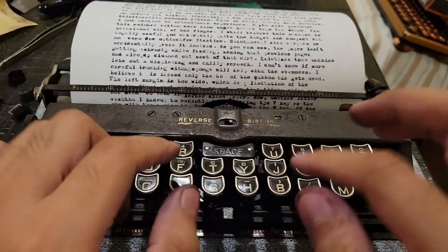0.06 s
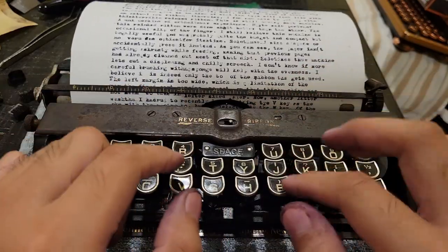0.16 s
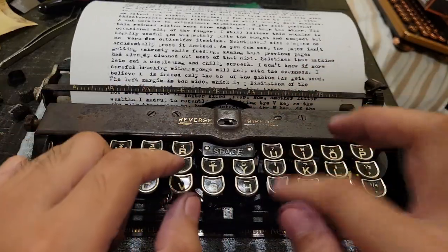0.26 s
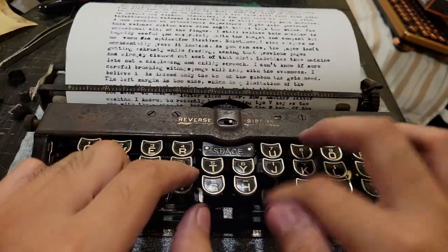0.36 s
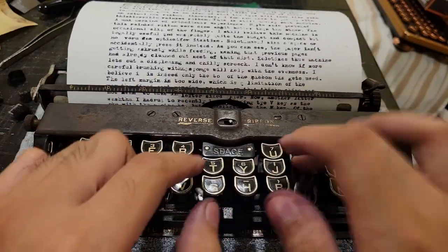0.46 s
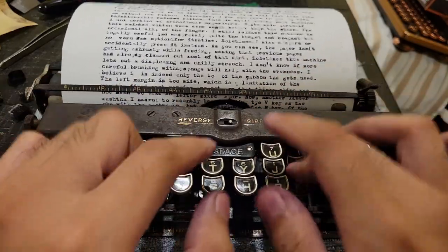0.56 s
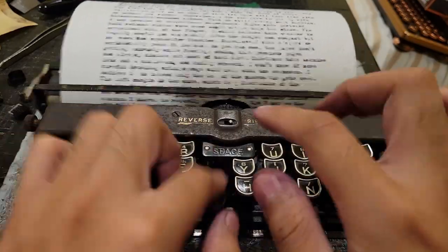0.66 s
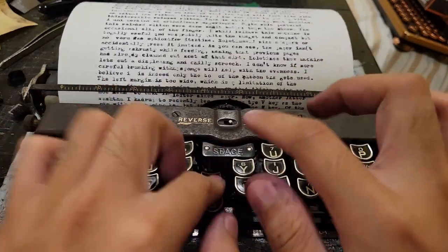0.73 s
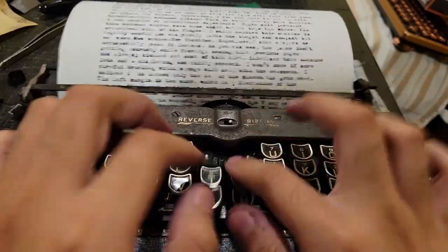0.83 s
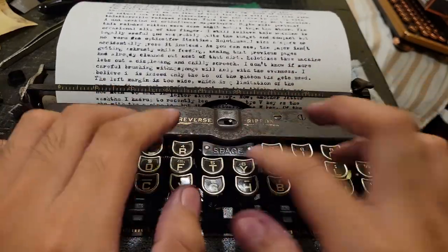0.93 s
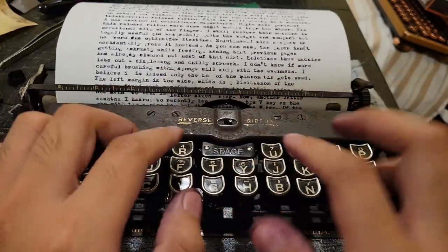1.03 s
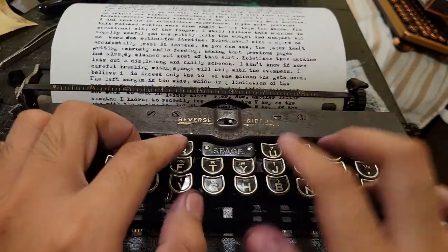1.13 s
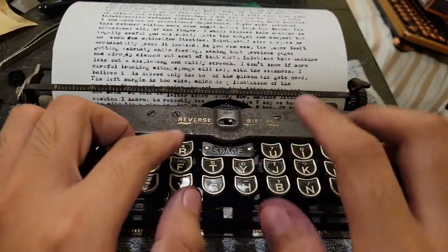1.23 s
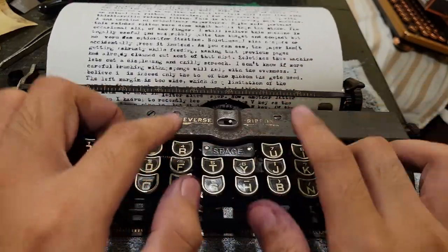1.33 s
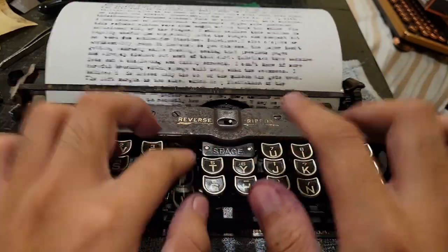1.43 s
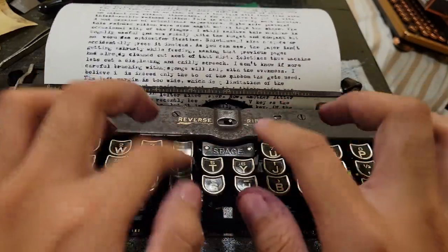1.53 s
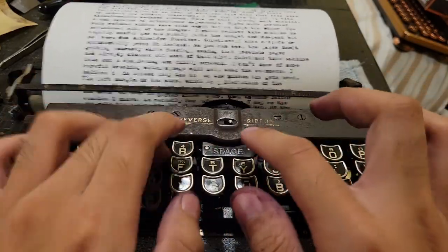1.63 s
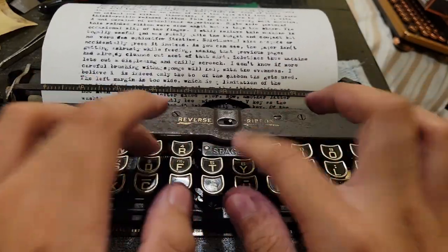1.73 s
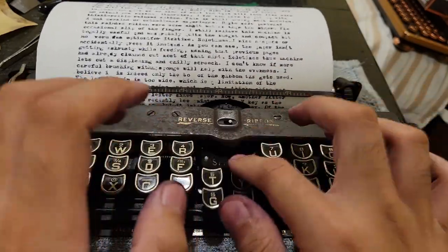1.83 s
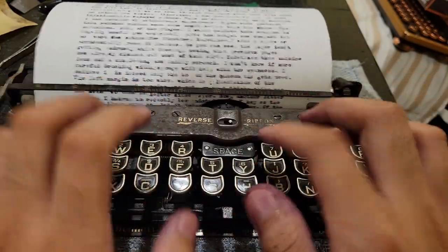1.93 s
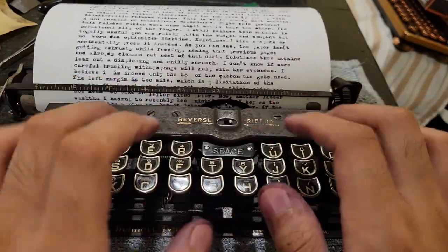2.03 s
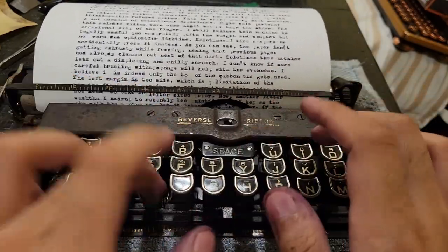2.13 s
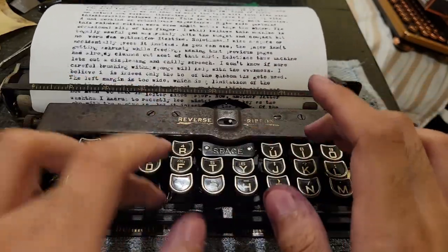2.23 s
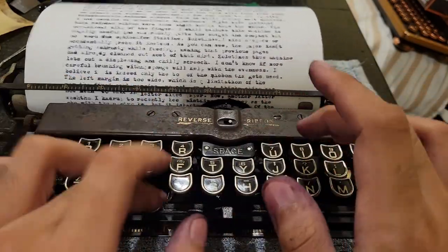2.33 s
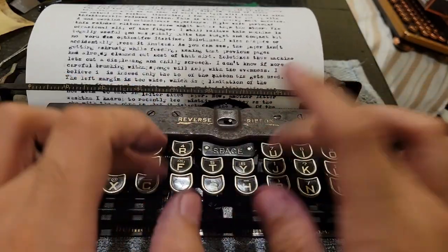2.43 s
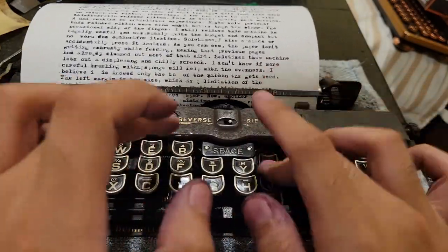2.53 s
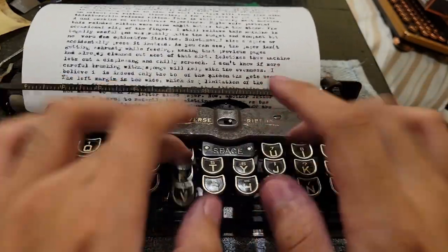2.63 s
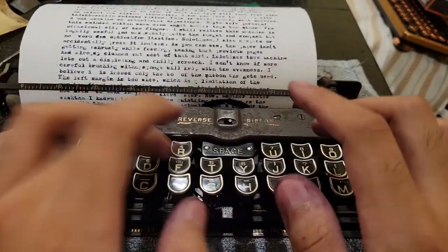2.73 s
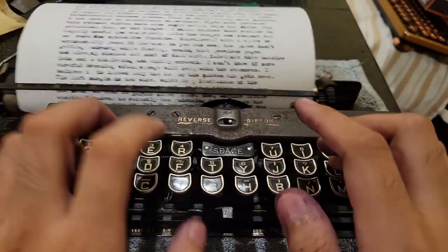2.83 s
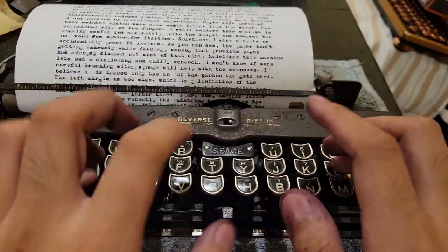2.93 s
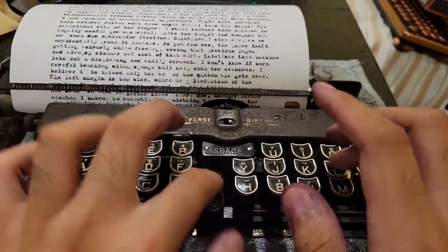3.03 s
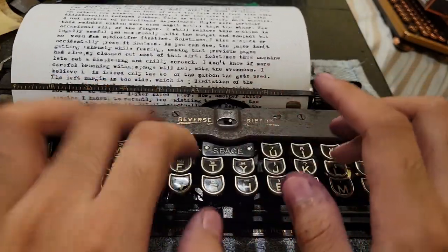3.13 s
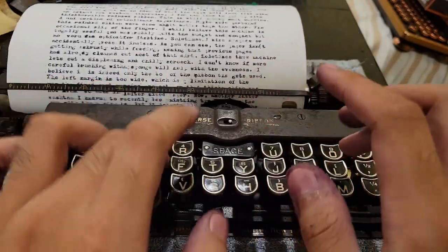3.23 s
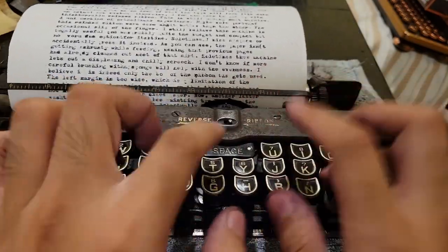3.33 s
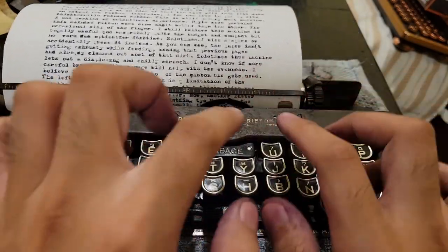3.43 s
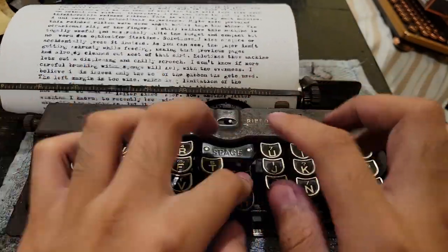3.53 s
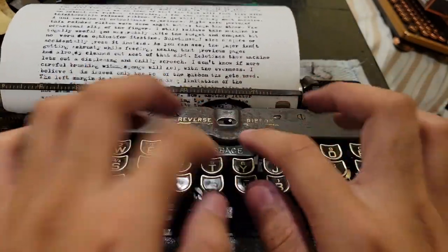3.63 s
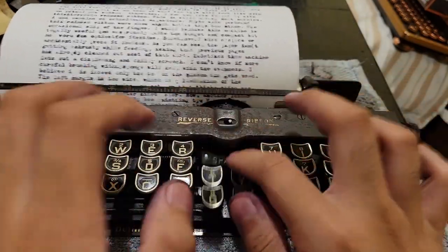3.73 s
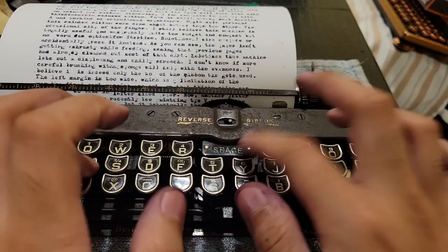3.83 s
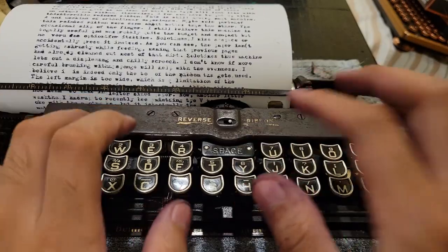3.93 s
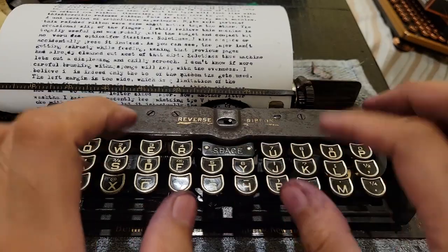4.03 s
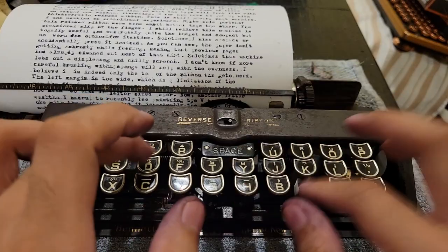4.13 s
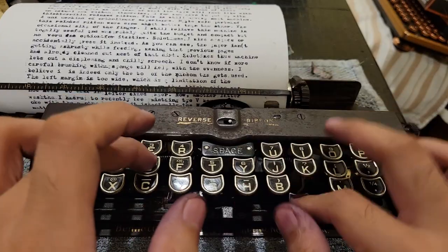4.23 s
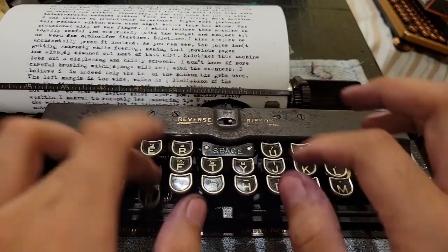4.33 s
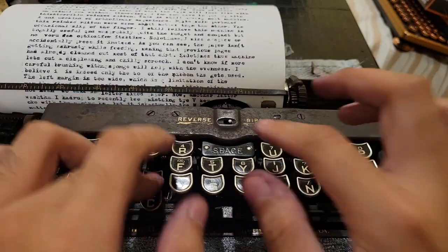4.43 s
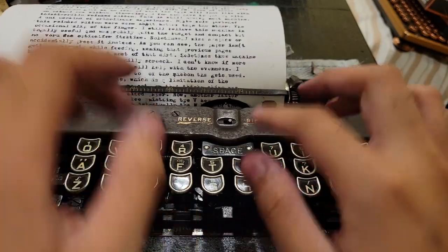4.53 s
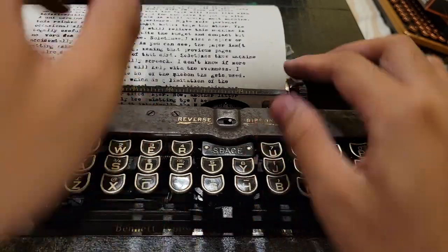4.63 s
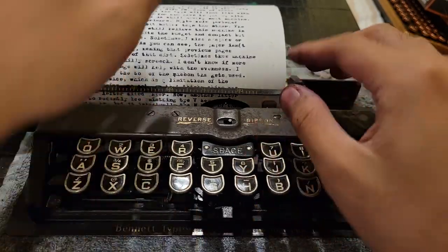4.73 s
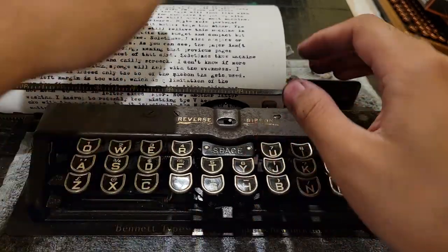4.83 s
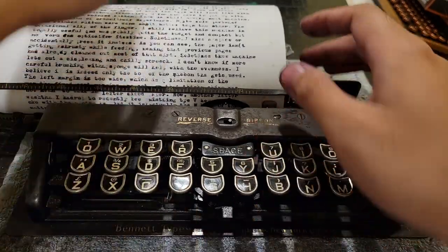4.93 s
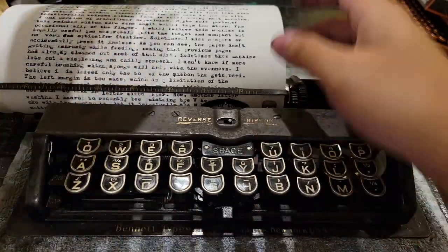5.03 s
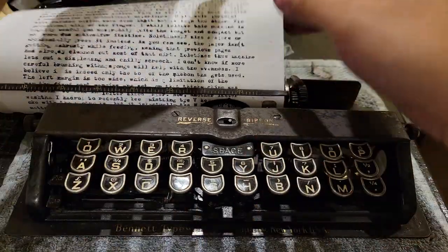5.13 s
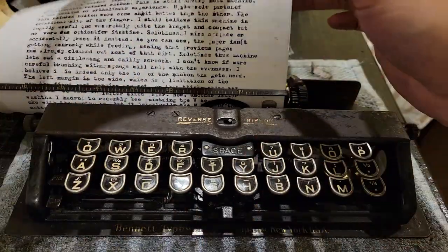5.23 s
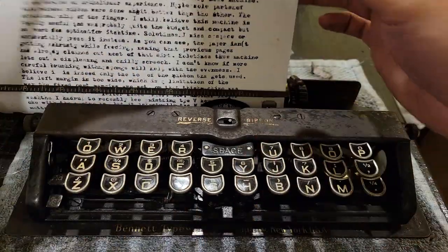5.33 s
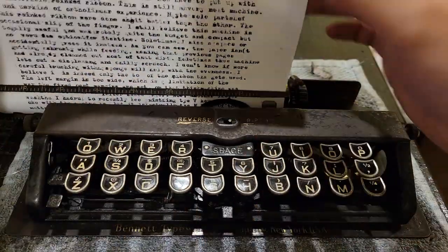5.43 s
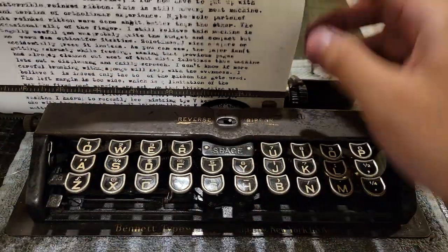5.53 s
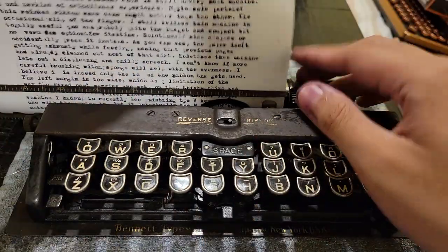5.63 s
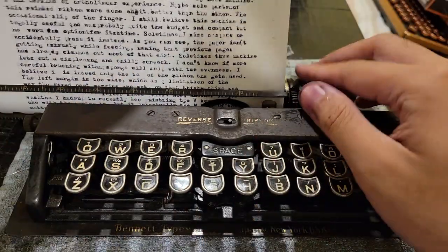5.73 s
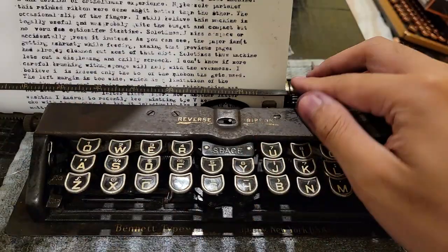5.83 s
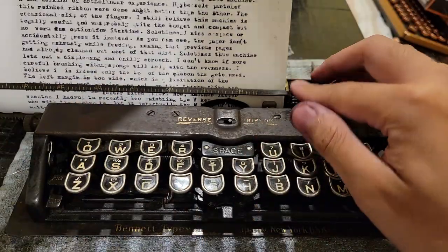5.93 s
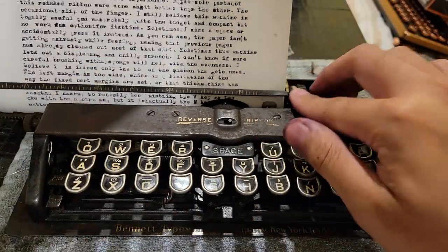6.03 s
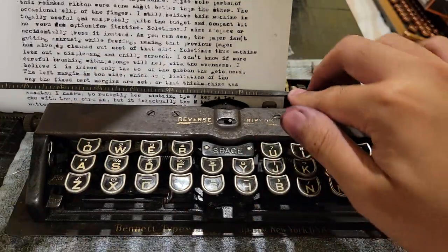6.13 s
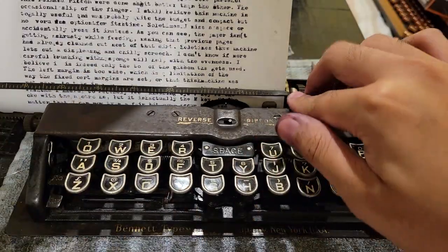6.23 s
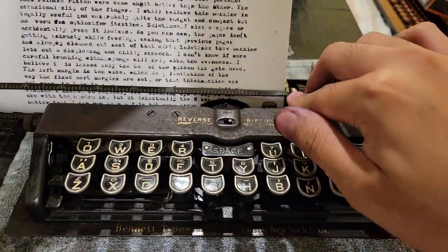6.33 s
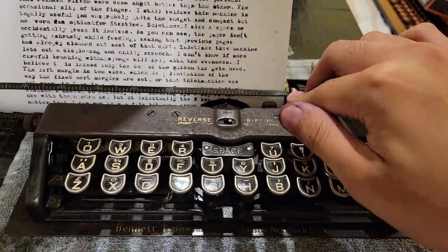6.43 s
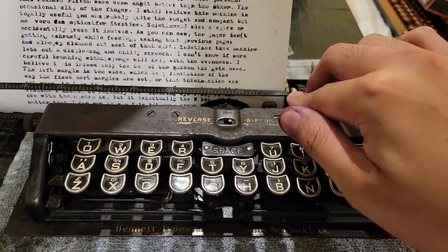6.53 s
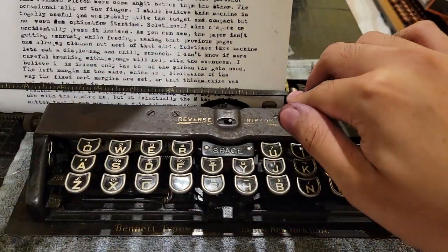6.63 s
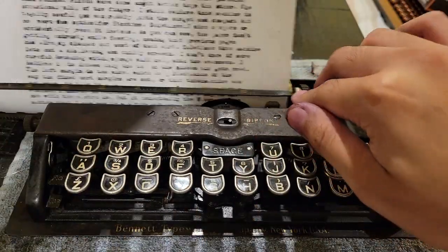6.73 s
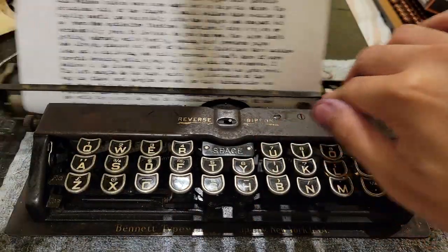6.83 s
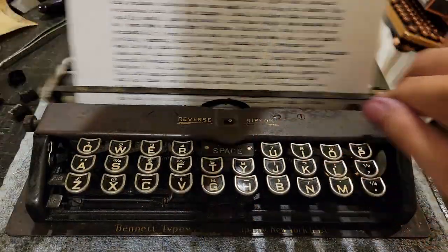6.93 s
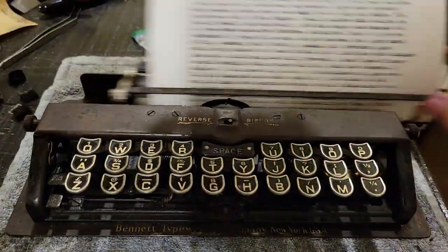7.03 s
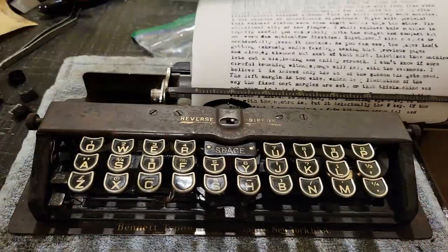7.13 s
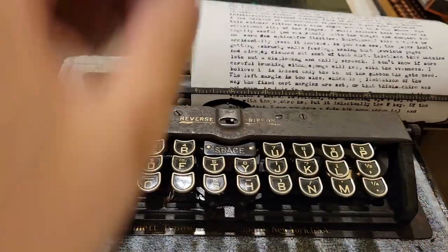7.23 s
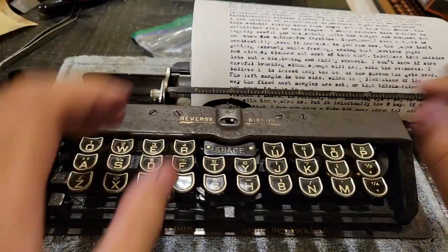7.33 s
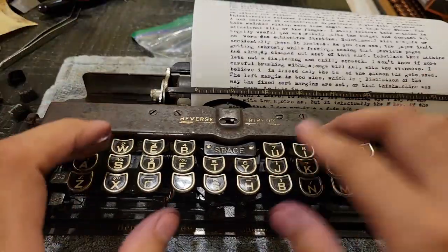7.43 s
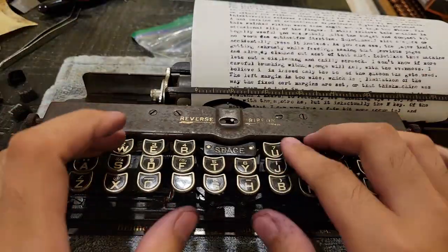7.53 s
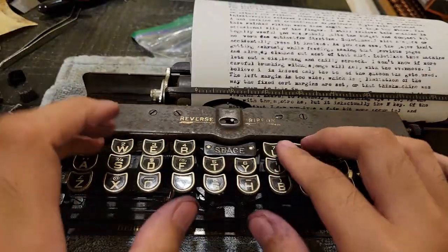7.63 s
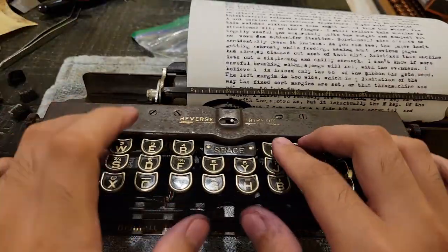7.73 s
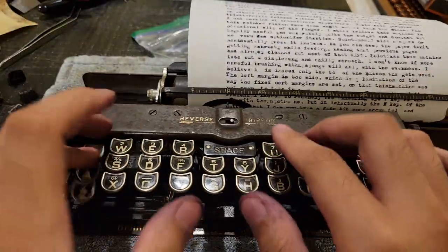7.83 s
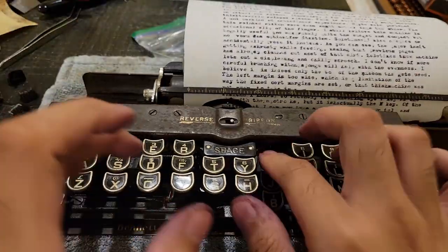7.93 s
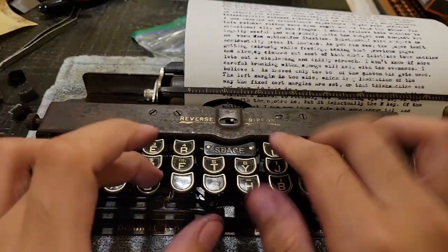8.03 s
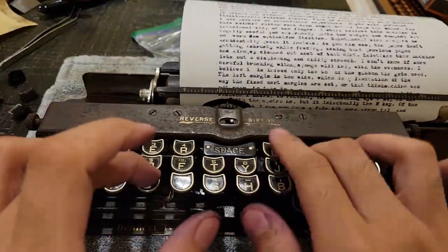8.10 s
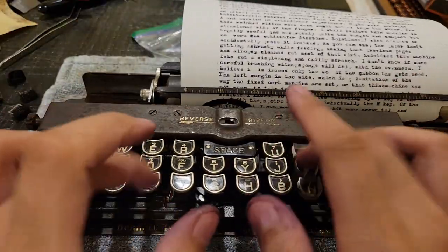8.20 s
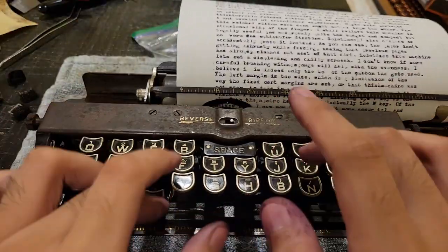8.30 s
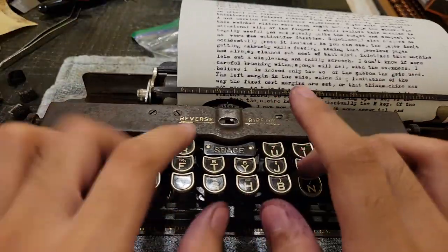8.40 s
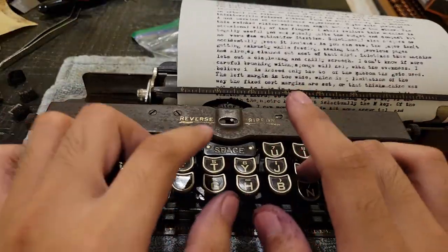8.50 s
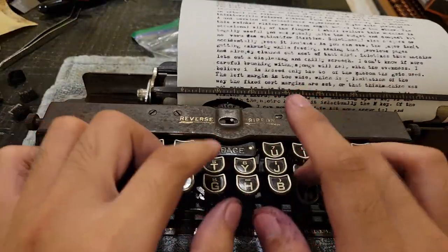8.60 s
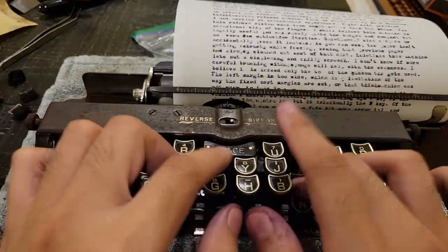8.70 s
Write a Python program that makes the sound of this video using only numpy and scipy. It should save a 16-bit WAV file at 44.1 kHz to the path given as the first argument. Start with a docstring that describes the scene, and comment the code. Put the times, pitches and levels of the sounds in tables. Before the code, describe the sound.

Close stereo microphone just above a small manual typewriter in a quiet room with short, diffuse reflections and faint low air noise. At 0 s a trace of an earlier stroke dies away. From about 0.3 to 4.5 s fast, slightly irregular typing, five or six letters a second: each a lever click, a hard bright steel crack on the platen, and a bottoming knock, with brief lever ringing, a weak table thud, rattling and lighter ticks between. From 5.0 to 6.3 s it is far quieter: the knob is twisted in short bursts, paper rubs softly, ratchet clicks, a tiny squeak and small bumps. A near silence follows. From 6.8 to 7.1 s the carriage slides with swelling grainy friction and low short squeaks, a click at 6.95, a bump at 7.1 and a sharp catch at 7.3, leaving a very faint spring tone. Typing resumes from 7.7 s until about 8.7 s.

```python
"""Fast typing on a small manual typewriter

Close microphone just above the keys, quiet room. Each letter is a cluster of blows: the lever clicks, the type
hits the platen, the frame thuds on the table; shaped noise makes the clicks and knocks, decaying sines the ringing.
Then the paper is wound up a line and the carriage pushed back, with grainy friction noise and short gliding
squeaks, and the typing goes on. Around it lie diffuse reflections, a faint spring tone and still air.
"""
import sys
import numpy as np
from scipy import signal
from scipy.fft import rfft, irfft
from scipy.io import wavfile

SR = 44100
rng = np.random.default_rng(int(sys.argv[2]) if len(sys.argv) > 2 else 0)


def unload_wav(signal):
    """Save mono or channel-first audio to the path in sys.argv[1] as 16-bit WAV at rate SR, clipped to [-1, 1]."""
    wavfile.write(
        sys.argv[1],
        SR,
        np.round(np.clip(np.atleast_2d(signal).T, -1, 1) * 32767).astype(np.int16),
    )


N = 386316
TIME = np.arange(N) / SR  # s
BLOW_SIZE, LEAD_SIZE = 6144, 1024  # samples of one blow, and those ahead of its contact
AGE = (np.arange(BLOW_SIZE) - LEAD_SIZE) / SR  # s since the contact

# likeness of the left and right microphone: f/Hz, correlation (0-1)
ALIKE = [(60, 1), (130, 0.8), (350, 0.6), (700, 0), (1400, 0.1), (3000, 0), (7000, 0.07)]
# steel clicking on steel, before any tilt: f/Hz, relative density/dB per Hz
CLICK = [(100, -32.5), (800, -12.5), (1500, -2), (2200, -1), (3000, 5.5), (4200, 0.5), (5500, -1.5),
         (8500, 0), (11000, -3), (13000, 0), (15500, -2)]
# carriage sliding on its rail: f/Hz, relative density/dB per Hz
RAIL = [(100,-12.5), (200,-20.5), (350,-10.5), (520,-11), (680,-13), (850,-19.5), (1360,-9.5), (2100,-14.5),
        (2800,-11.5), (5000,-14), (11000,-25.5), (14200,-19.5), (16000,-32)]
# light ringing clicks and ticks between the strikes, and one weak keystroke:
# t/s, base click level/dB, base ring level/dB
LIGHT_CLICKS = [(0.4083, -22.5, -23), (0.4339, -17, -26.5), (0.4872, -26.5, -26), (0.5, -32, -26.5),
                (0.6162, -26, -22.5), (0.6438, -19.5, -24), (0.7933, -19.5, -25.5), (0.9298, -22.5, -23.5),
                (1.05, -22, -30.5), (1.0722, -21, -22), (1.1758, -18.5, -31), (1.219, -17, -24),
                (1.2602, -31.5, -31), (1.4025, -22.5, -27.5), (1.4423, -15.5, -28.5), (1.5456, -15, -22.5),
                (1.5575, -28, -25), (1.721, -16, -25.5), (1.7462, -23.5, -24), (1.8911, -20, -24.5),
                (1.916, -31, -45), (2.0447, -21, -26), (2.0994, -18.5, -22.5), (2.1346, -28.5, -29.5),
                (2.252, -17, -25), (2.2859, -22, -26.5), (2.4311, -18, -26), (2.4668, -23, -23),
                (2.612, -22.5, -24), (2.6281, -25.5, -29.5), (2.644, -20, -36), (2.7436, -16.5, -25),
                (2.7557, -29.5, -27.5), (2.8189, -24.5, -42), (2.9206, -23, -27), (2.9747, -20.5, -22.5),
                (3.109, -17.5, -23.5), (3.2734, -18.5, -29), (3.312, -24, -25.5), (3.486, -26.5, -29),
                (3.6327, -27.5, -24), (3.6554, -19.5, -26.5), (3.7236, -24, -27), (3.8361, -19.5, -23),
                (3.8577, -27, -46.5), (3.9911, -22.5, -27.5), (4.0432, -21.5, -22.5), (4.0804, -27, -35),
                (4.2824, -24.5, -31.5), (4.3193, -17.5, -24), (4.4802, -23, -31.5), (4.521, -24.5, -24.5),
                (4.547, -31.5, -42), (7.664, -39, -45.5), (7.7062, -24, -26.5), (7.8204, -19, -23),
                (7.8788, -18, -19.5), (8.006, -18.5, -24.5), (8.023, -22, -24.5), (8.2007, -22.5, -23),
                (8.229, -17, -26), (8.3749, -15.5, -23), (8.4039, -19, -23), (8.4377, -29.5, -32),
                (8.611, -36, -37)]
# ratchet of the platen and catches of the carriage: t/s, base click level/dB, base ring level/dB
RATCHET = [(5.1345, -56, -51.5), (5.4336, -33, -34.5), (5.5412, -31.5, -27), (5.6434, -32.5, -35),
           (5.7099, -43.5, -48), (5.8047, -51.5, -59), (5.8347, -51, -49), (5.8678, -66, -47),
           (5.977, -46, -54), (6.0085, -48, -40.5), (6.0507, -59, -37), (6.2345, -52, -39),
           (6.9443, -23, -24.5), (7.257, -37.5, -58), (7.2803, -19.5, -32.5)]


def amp(db):
    """Decibels to gain."""
    return 10 ** (np.asarray(db) / 20)


def read(points, hz):
    """Interpolates (Hz, value) points along a log-frequency axis."""
    f, value = np.transpose(points)
    return np.interp(np.log(hz + 1), np.log(f), value)


def pair(left, other, alike):
    """A right-hand spectrum that shares the given part of the left one."""
    return alike * left + np.sqrt(1 - alike ** 2) * other


def noise(spectrum, size, count=1, colour_db=0, colour_hz=450):
    """Stereo noises (count, 2, size) of rms 1, each with its own chance peaks and dips about colour_hz apart."""
    hz = np.fft.rfftfreq(size, 1 / SR)
    z = rfft(rng.standard_normal((count, 2, size)))
    z[:, 1] = pair(z[:, 0], z[:, 1], read(ALIKE, hz))
    heights = rng.standard_normal((count, 256))
    colour = np.array([np.interp(hz / colour_hz, np.arange(256), h) for h in heights])[:, None]
    x = irfft(z * amp(read(spectrum, hz) + colour_db * colour), size)
    return x / np.sqrt(np.mean(x ** 2, axis=(1, 2), keepdims=True))


def swell(rise_s, lead_db=-15, lead_factor=1.4):
    """A soft onset: a weak slower rise under a strong quick one, full from the contact on."""
    before = np.minimum(AGE, 0) / rise_s
    lead = amp(lead_db)
    return (1 - lead) * np.exp(before) + lead * np.exp(before / lead_factor)


def fade(t60):
    """Free decay after the contact, 60 dB in t60 seconds."""
    return amp(-60 * np.maximum(AGE, 0) / t60)


def build_up(rise_s):
    """Slow answer of a body, silent until the contact."""
    return 1 - np.exp(-np.maximum(AGE, 0) / rise_s)


def modes(mode_rows, count, detune, scatter_db, spread):
    """Decaying sines, scattered in pitch and level from blow to blow, with a phase gap between the ears."""
    out = np.zeros((count, 2, BLOW_SIZE), np.float32)
    ears = np.array([[-0.5], [0.5]])
    for hz, db, t60 in mode_rows:
        tune, size, phase, side = rng.standard_normal((count, 4)).T[..., None, None]
        turns = hz * (1 + detune * tune) * AGE + phase
        angle = 2 * np.pi * turns + spread * side * ears
        decay = amp(db + scatter_db * size) * fade(t60)
        out += np.sin(angle.astype(np.float32)) * decay.astype(np.float32)
    return out


def play(times, db, sounds, span_s):
    """Lays the sounds at their times; db is the level each would have if packed into span_s."""
    energy = np.sum(sounds ** 2, axis=2).mean(1) / SR
    gains = amp(db) * np.sqrt(span_s / energy)
    out = np.zeros((2, N + 2 * BLOW_SIZE))
    for s, gain, sound in zip(times, gains, sounds):
        at = int(np.clip(round(s * SR), 0, N))
        out[:, at:at + BLOW_SIZE] += gain * sound
    return out[:, LEAD_SIZE:LEAD_SIZE + N]


def keystrokes():
    """Rows of blows: per letter the lever catches, the type strikes, the key bottoms; light clicks lie between."""
    # letters: strike t/s, strike level/dB, catch lead/s, catch level/dB, bottoming lag/s,
    # finger weight (ring and knock) level/dB, table thump level/dB; levels before the offsets below
    letters = [(0.311, -17.5, .016, -24, .014, -25.5, -43), (0.525, -15.5, 0.031, -18, .006, -24.5, -43),
               (0.686, -19, 0.0084, -21.5, .023, -24.5, -43.5), (0.8412, -20, .014, -20.5, .02, -25, -41),
               (1.0923, -19.5, 0.0076, -20.5, .008, -26, -43), (1.3, -14.5, .016, -18.5, 0.026, -27, -38.5),
               (1.4544, -24, .011, -31.5, .029, -29, -47.5), (1.645, -16, 0.02, -19.5, .022, -28, -48.5),
               (1.7844, -16, .016, -27, .027, -25.5, -40), (1.969, -18, 0.014, -20.5, .014, -30, -45.5),
               (2.171, -13.5, 0.024, -20.5, .014, -26, -48), (2.337, -16, 0.016, -25.5, .014, -28.5, -44),
               (2.5007, -18.5, 0.015, -21.5, .027, -28, -41.5), (2.669, -22, .012, -24, .015, -27.5, -39),
               (2.8594, -14.5, .016, -22, .01, -33, -45), (3.0181, -17, 0.0097, -27, 0.031, -28, -42),
               (3.1941, -17.5, 0.02, -15, .025, -26, -47), (3.365, -19.5, 0.025, -19, .021, -26.5, -42),
               (3.539, -20.5, 0.021, -18.5, .007, -26.5, -41), (3.757, -23, .022, -24.5, .008, -28, -38.5),
               (3.906, -16.5, 0.014, -32, .007, -30, -44.5), (4.191, -16.5, 0.024, -22, .014, -27, -45),
               (4.37, -15, 0.021, -24.5, .014, -29, -45), (7.713, -17, 0.0071, -24, .011, -26, -45.5),
               (7.903, -19, .009, -27, .024, -27.5, -41.5), (8.087, -15, 0.013, -20.5, .02, -23.5, -36),
               (8.258, -13.5, 0.02, -29, .016, -26, -44.5), (8.661, -20.5, .024, -26, 0.0061, -28.5, -44)]
    # offsets by kind of blow: steel/dB, lever ring/dB, frame knock/dB, table thump/dB; then rise/ms
    catch, strike = (-0.5, -8.5, -5, -5.5, 1.1), (0, -4, -2, -1.5, 2)
    bottom, light = (-6.5, -9.5, 0, -3.5, 3.5), (0.5, -0.5, -11.5, -30, 0.87)
    s, strength_db, lead_s, catch_db, lag_s, weight_db, thump_db = np.transpose(letters)
    return np.vstack([
        voiced(s - lead_s, catch_db, weight_db, thump_db, catch),
        voiced(s, strength_db, weight_db, thump_db, strike),
        voiced(s + lag_s, strength_db, weight_db, thump_db, bottom),
        snaps(LIGHT_CLICKS, light),
    ])


def voiced(s, steel_db, body_db, thump_db, kind):
    """Rows of one kind of blow: s, steel click dB, lever ring dB, frame knock dB, table thump dB, rise ms."""
    steel, lever, knock, thump, rise_ms = kind
    return np.column_stack([s, steel_db + steel, body_db + lever, body_db + knock,
                            thump_db + thump, np.full(len(s), rise_ms)])


def snaps(rows, kind):
    """Light blows: frame and table take a fixed share of the ring."""
    s, steel_db, ring_db = np.transpose(rows)
    return voiced(s, steel_db, ring_db, ring_db, kind)


def blows(rows, body, detune, tilt_db, steel_stretch=1.2):
    """Every blow excites steel, lever, body and table; tilt_db per octave brightens or dulls the steel."""
    s, click_db, ring_db, knock_db, thump_db, rise_ms = np.transpose(rows)
    rise_s = rise_ms[:, None, None] / 1000
    steel = [(hz, db + tilt_db * np.log2(hz)) for hz, db in CLICK]
    # the steel click rises a little slower than the ring and knock
    metal = clicks(s, click_db, steel_stretch * rise_s, steel) + levers(s, ring_db, rise_s)
    return metal + frame(s, knock_db, rise_s, body, detune) + table(s, thump_db)


def clicks(s, db, rise_s, steel_spectrum, t60=0.022, chatter_db=-24, chatter_t60=0.042,
           scrape_db=-22, scrape_s=0.005, grain_db=3):
    """Steel on steel: a scrape of the moving lever, a sharp crack, then loose parts chattering."""
    steps = rng.standard_normal((len(s), 1, BLOW_SIZE // 32))
    grain = amp(grain_db * np.repeat(steps, 32, axis=2))
    crack = swell(rise_s) * fade(t60)
    scrape = amp(scrape_db) * np.exp(-abs(AGE) / scrape_s)
    chatter = amp(chatter_db) * fade(chatter_t60)
    loose = np.where(AGE < 0, scrape, chatter)
    envelope = np.sqrt(crack ** 2 + loose ** 2 + bounces(len(s)))
    steel = noise(steel_spectrum, BLOW_SIZE, len(s), colour_db=5.0, colour_hz=475.7)
    return play(s, db, steel * grain * envelope, span_s=0.0085)


def bounces(count, size_db=-13, mean_s=0.0027, t60=0.054):
    """Power envelope of three rebounds of loose parts, each with a chance delay and size."""
    delay, size = rng.exponential(1, (count, 2, 3, 1)).transpose(1, 0, 2, 3)
    since = AGE - mean_s * delay
    power = amp(2 * (size_db - 60 * abs(since) / t60))
    return np.sum((since > 0) * size * power, axis=1, keepdims=True)


def levers(s, db, rise_s, damped_t60=0.03, free_db=-30):
    """A lever rings loudly for a few cycles, then faintly as it rests against its stop."""
    # key levers, before the extra damping: f/Hz, relative level/dB, t60/s
    lever_modes = [(1370, -8, 0.55), (1450, -5.5, 0.067), (1583, -0.5, 0.05), (1806, 1.5, 0.067),
                   (1930, -15, .15), (2756, -1.5, 0.11), (2800, -16, .1), (4140, -9, 0.15)]
    ring = modes(lever_modes, len(s), detune=0.029, scatter_db=3, spread=0.96)
    damping = fade(damped_t60) + amp(free_db)
    return play(s, db, ring * swell(rise_s / 2) * damping, span_s=0.013)


def frame(s, db, rise_s, body, detune, knock_t60=0.044, ring_db=-3, ring_rise_s=0.0059):
    """A dull knock of the platen, and the hollow ring of the body that builds up after it."""
    # knock of the platen: f/Hz, relative density/dB per Hz
    knock_spectrum = [(60, -18), (230, -4.5), (350, -18.5), (600, 2), (900, -3), (1500, -2.5), (2200, -6.5),
                      (3200, -6.5), (5000, -10), (15000, -40.5)]
    knock = noise(knock_spectrum, BLOW_SIZE, len(s), colour_db=2.0, colour_hz=182)
    knock = knock * swell(rise_s) * fade(knock_t60)
    ring = modes(body, len(s), detune, scatter_db=1.5, spread=0.43) * build_up(ring_rise_s)
    return play(s, db, knock, span_s=0.016) + play(s, db + ring_db, ring, span_s=0.0098)


def table(s, db, rise_s=0.026):
    """The machine pushes on its cloth pad and the table answers slowly with low modes."""
    # table top: f/Hz, relative level/dB, t60/s
    table_modes = [(40, -20, 0.096), (59.6, 1.5, 0.11), (86, 2.5, 0.12), (120.5, -6, 0.13),
                   (171.5, -6, 0.084)]
    push = build_up(rise_s) * signal.windows.tukey(BLOW_SIZE, 0.3)
    thump = modes(table_modes, len(s), detune=0.054, scatter_db=-0.5, spread=0.3)
    return play(s, db, thump * push, span_s=0.07)


def jostle(rows, db=-9, travel_s=0.008, settle_s=0.023, grain_db=5.0, grain_size=96):
    """Every blow of the keys shakes the neighbouring levers: a rattle swells up to it and settles after."""
    # bank of levers jostling: f/Hz, relative density/dB per Hz
    jostle_spectrum = [(200, -7.5), (700, -5.5), (1100, 4.5), (1450, 9.5), (1800, -10.5), (2200, 3.5),
                       (2850, -3.5), (4500, -5.5), (9000, -25), (15500, -24)]
    s, click_db, ring_db = np.transpose(rows)[:3]
    shake = np.exp(-abs(AGE) / np.where(AGE < 0, travel_s, settle_s))
    steps = rng.standard_normal((len(s), 1, BLOW_SIZE // grain_size))
    grain = amp(grain_db * np.repeat(steps, grain_size, axis=2))
    rattle = noise(jostle_spectrum, BLOW_SIZE, len(s), colour_db=6.0, colour_hz=290) * shake * grain
    return play(s, db + np.maximum(ring_db, click_db - 5.5), rattle, span_s=0.014)


def loose_ticks(db=-15, scatter_db=4, soonest_s=0.018, latest_s=0.06, rise_s=0.0004):
    """After each light click a loose link ticks once, a chance moment later."""
    s, steel_db, _ = np.transpose(LIGHT_CLICKS)
    wait, size = rng.uniform(0, 1, (len(s), 2)).T
    tick_s = s + soonest_s + (latest_s - soonest_s) * wait
    tick_db = steel_db + db + scatter_db * (2 * size - 1)
    return clicks(tick_s, tick_db, rise_s, CLICK)


def carriage_blows():
    """Rows of blows as the paper is wound and the carriage returns: light catches and bumps on the frame."""
    # offsets of a catch: steel/dB, lever ring/dB, frame knock/dB, table thump/dB; then rise/ms
    pawl = (1.5, -7.5, -5, -27, 0.6)
    # carriage against frame: t/s, steel click level/dB, lever ring level/dB, frame knock level/dB,
    # table thump level/dB, rise/ms
    bumps = [(5.499, -62, -55, -43, -42, 4.1), (5.599, -43, -60, -46, -47, 1.4),
             (5.645, -36, -41, -32, -46, 5.8), (6.247, -32, -39, -26.5, -38.5, 4.4),
             (6.255, -34, -44, -34, -47, 2.2), (7.1186, -22, -52, -24.5, -39, 2.1),
             (7.216, -56, -48, -45, -57, 1.4)]
    return np.vstack([snaps(RATCHET, pawl), bumps])


def line_feed(paper_sag_db_per_s=-20, hand_sag_db_per_s=-8, rail_swell_db_per_s=48, roller_db=0.5, left_db=1):
    """Friction of the knob winding the paper up, then of the carriage on its rail, swelling as it runs."""
    # twists of the knob: start t/s, length/s, paper starting level/dB, hand starting level/dB
    twists = [(5.015, 0.036, -75, -82), (5.135, 0.076, -47, -72), (5.295, 0.14, -57, -61.5),
              (5.434, 0.25, -47.5, -42.5), (5.797, 0.042, -59, -56), (5.962, 0.026, -43.5, -55)]
    # push of the carriage: start t/s, length/s, starting level/dB
    push = (6.78, .335, -52.5)
    # paper rustling, platen rolling in its bearings, hand rumbling on the knob: f/Hz, relative density/dB per Hz
    paper_spectrum, roller_spectrum = [(100, -6), (300, -25), (500, -5), (700, -7), (860, -30),
                                       (1050, -2.5), (1400, -7), (2000, -11.5), (3000, -9.5), (5000, -13),
                                       (10000, -21.5), (16000, -27)], [(110, -24), (180, -3), (345, -2), (655, 0),
                                                      (873, -22), (1050, -8), (1950, -16), (3060, -9),
                                                      (3600, -25), (4680, -48), (7920, -120)]
    rumble_spectrum = [(20, -16), (62, -1), (110, -17), (200, -27), (500, -48), (2000, -80)]
    drag = sum(motion(s, length, db, paper_sag_db_per_s, attack_s=0.0094, release_s=0.0093)
               for s, length, db, _ in twists)
    grip = sum(motion(s, length, db, hand_sag_db_per_s, attack_s=0.008, release_s=0.021)
               for s, length, _, db in twists)
    slide = motion(*push, rail_swell_db_per_s, attack_s=0.014, release_s=0.014)
    paper = rub(drag, paper_spectrum, grain_db=4, grain_s=0.0026)
    roller = amp(roller_db) * rub(grip, roller_spectrum, grain_db=7, grain_s=0.0082)
    hand = rub(grip, rumble_spectrum, grain_db=6.5, grain_s=0.029)
    rail = rub(slide, RAIL, grain_db=3, grain_s=0.0035)
    return (paper + roller + rail) * amp([[left_db], [-left_db]]) + hand


def motion(start, length, db, slope_db_per_s, attack_s, release_s):
    """Loudness of one movement of the hand: it sets in, swells or sags steadily, and stops."""
    age = TIME - start
    outside = np.minimum(age, 0) / attack_s - np.maximum(age - length, 0) / release_s
    return amp(db + slope_db_per_s * np.clip(age, 0, length)) * np.exp(np.maximum(outside, -30))


def rub(level, spectrum, grain_db, grain_s):
    """Stick-slip friction: grainy noise that follows the motion."""
    slips = np.interp(TIME / grain_s, np.arange(N), rng.standard_normal(N))
    grain = amp(grain_db * slips)
    return noise(spectrum, N)[0] * level * grain / np.sqrt(np.mean(grain ** 2))


def squeaks(glide=0.012, waver=0.0217):
    """Dry parts of knob and rail stick and slip for a moment: an unsteady tone that rises a little."""
    # squeaks: middle t/s, pitch there f/Hz, peak level/dB, half length/s
    squeak_rows = [(5.134, 1241, -38.5, 0.0066), (6.986, 650, -40.5, 0.014), (7.058, 685, -39.5, 0.016),
                   (7.215, 1300, -43, 0.0071)]
    out = np.zeros(N)
    for s, hz, db, half_s in squeak_rows:
        u = np.clip((TIME - s) / half_s, -4, 4)
        unsteady = np.interp(TIME * 150, np.arange(N), rng.standard_normal(N))  # 150 chance values a second
        turns = np.cumsum(hz * (1 + glide * u + waver * unsteady)) / SR
        out += amp(db) * np.exp(-u ** 2) * np.sin(2 * np.pi * turns)
    return out


def spring(hz=870, db=-60, t60=1.4):
    """A spring sings faintly after the last catch of the carriage: one decaying sine."""
    age = TIME - RATCHET[-1][0]
    return (age > 0) * amp(db - 60 * abs(age) / t60) * np.sin(2 * np.pi * hz * age)


def earlier_stroke(db=-53, t60=0.43):
    """The rattle of a stroke just before dies away in the room: decaying noise from the first moment."""
    return noise(RAIL, N)[0] * amp(db - 60 * TIME / t60)


def room(x, build_s=0.00043):
    """Diffuse reflections that build up quickly and die band by band."""
    # reverberation of the room: f/Hz, t60/s
    room_t60 = [(100, 0.59), (350, 0.34), (800, 0.27), (1500, 0.26), (4000, 0.26), (9000, 0.2365),
                (15000, 0.33)]
    t = TIME[:SR // 2]
    hz, when, z = signal.stft(rng.standard_normal((2, len(t))), SR, nperseg=256)
    z[1] = pair(z[0], z[1], read(ALIKE, hz)[:, None])
    decay = amp(-60 * when / read(room_t60, hz)[:, None])
    tail = signal.istft(z * decay, SR, nperseg=256)[1][:, :len(t)]
    tail = tail * (1 - np.exp(-t / build_s))
    return signal.fftconvolve(x, tail / np.linalg.norm(tail[0]), axes=1)[:, :N]


def still_air(db=-63.5):
    """The still air of the room: steady noise, heaviest in the bass."""
    # room air: f/Hz, relative density/dB per Hz
    air_spectrum = [(20,-10), (100,-1.5), (135,-4), (200,-16), (290,-15), (900,-29), (1400,-29.5),
                    (3000,-32.5), (6000,-39), (16000,-49.5)]
    return amp(db) * noise(air_spectrum, N)[0]


def scene(room_db=-8, left_db=0.25, sway_hz=1.7):
    """The machine close by, reflections swaying steadily between two diffuse tails, and still air."""
    # ringing bodies of frame and carriage: f/Hz, relative level/dB, t60/s
    frame_modes, carriage_modes = [(307, -12, 0.099), (345.9, -4, .09), (392, 2.5, 0.053),
                                   (465.3, -3.5, 0.057), (587, -15, 0.039), (700.7, -2.5, 0.053)], [(285, -9, 0.13), (325.4, 0, 0.04), (370, 4, 0.04),
                                                  (552, -19, 0.054), (688, -13.5, 0.075),
                                                  (1045, 3.5, 0.024), (1400, -7.5, 0.073),
                                                  (1470, -14, 0.093)]
    keys = keystrokes()
    typing = blows(keys, frame_modes, detune=0.039, tilt_db=0.95) + jostle(keys) + loose_ticks()
    new_line = blows(carriage_blows(), carriage_modes, detune=0.016, tilt_db=-3.5) + line_feed() + squeaks()
    machine = (typing + new_line) * amp([[left_db], [-left_db]])
    sway = 2 * np.pi * sway_hz * TIME
    reflections = room(machine * np.cos(sway)) + room(machine * np.sin(sway))
    return machine + amp(room_db) * reflections + spring() + earlier_stroke() + still_air()


def record(dry, edge_hz=16050):
    """Peaks beyond full scale clip; then a steep low-pass limits the band."""
    low_pass = signal.firwin(401, edge_hz, window=("kaiser", 8), fs=SR)
    return signal.oaconvolve(np.clip(dry, -1, 1), low_pass[None], "same", axes=1)


dry = scene()
out = record(dry)
unload_wav(out)
```